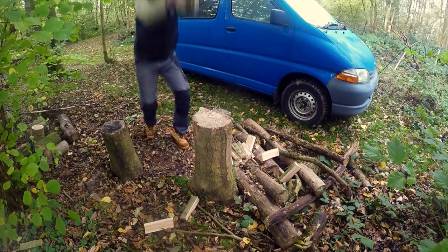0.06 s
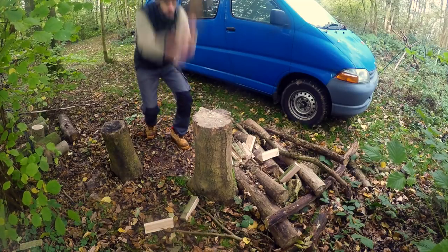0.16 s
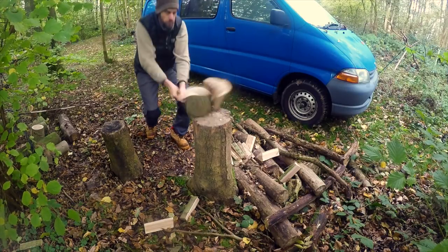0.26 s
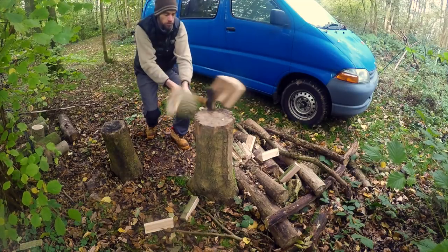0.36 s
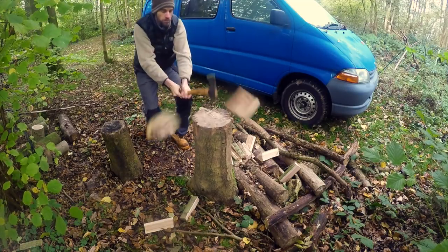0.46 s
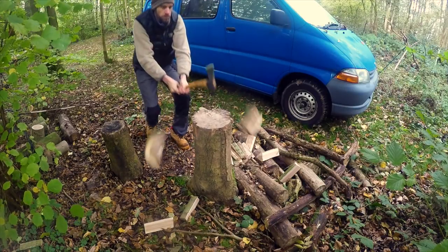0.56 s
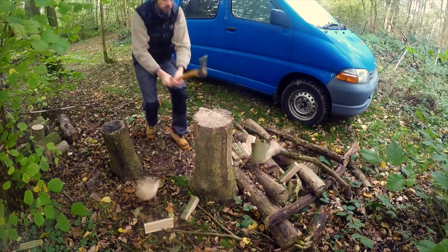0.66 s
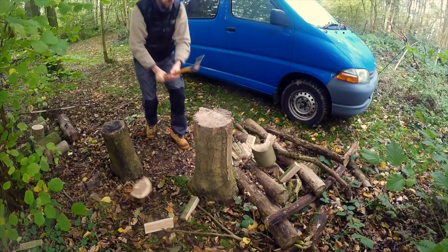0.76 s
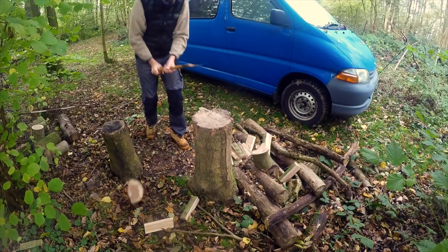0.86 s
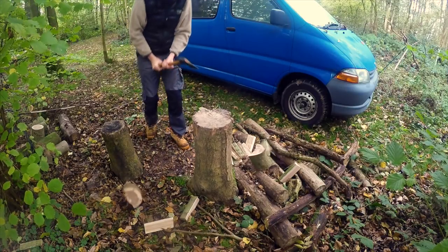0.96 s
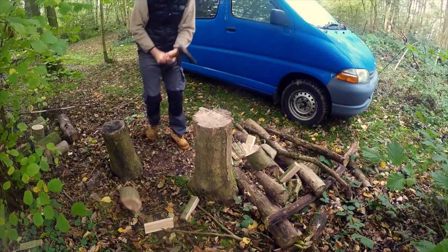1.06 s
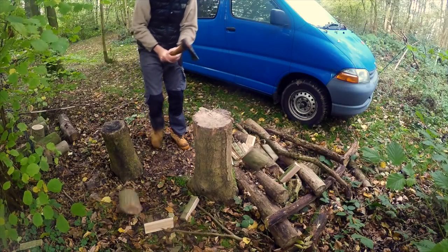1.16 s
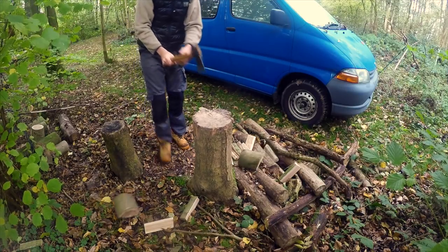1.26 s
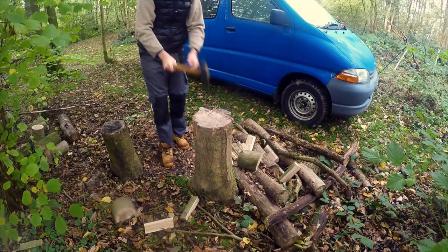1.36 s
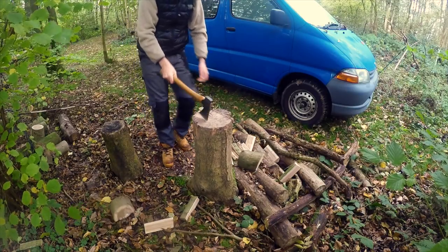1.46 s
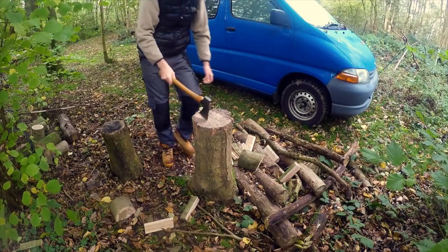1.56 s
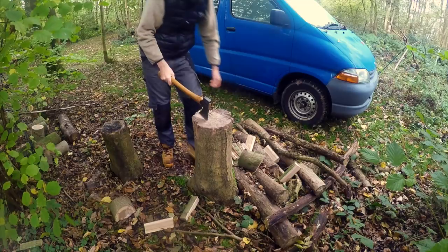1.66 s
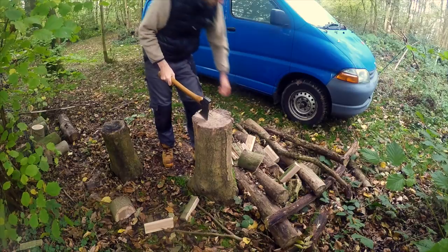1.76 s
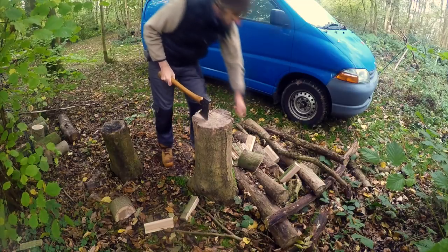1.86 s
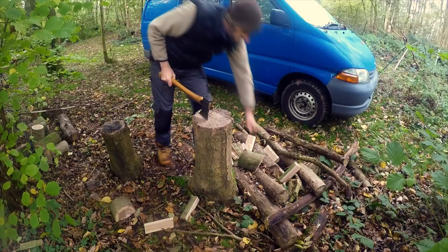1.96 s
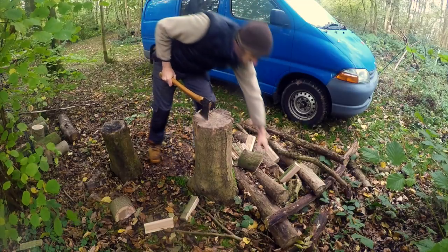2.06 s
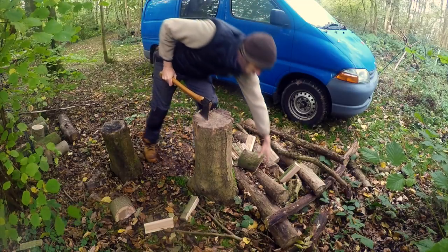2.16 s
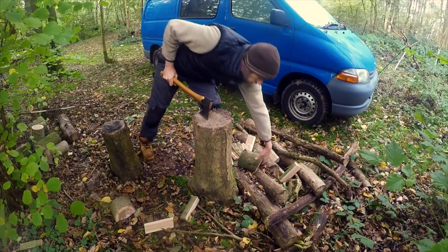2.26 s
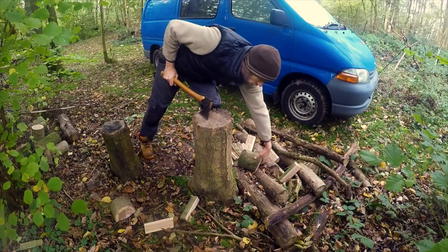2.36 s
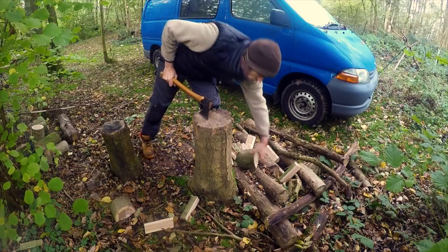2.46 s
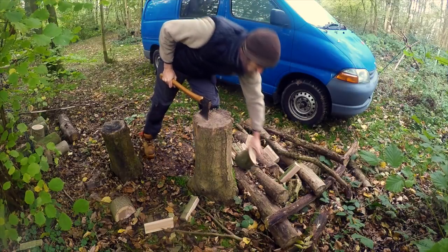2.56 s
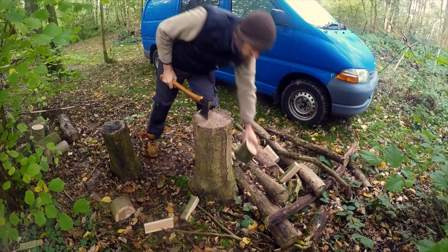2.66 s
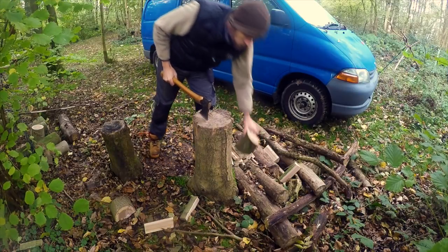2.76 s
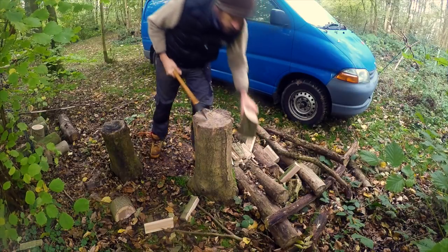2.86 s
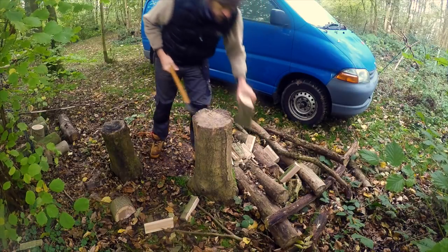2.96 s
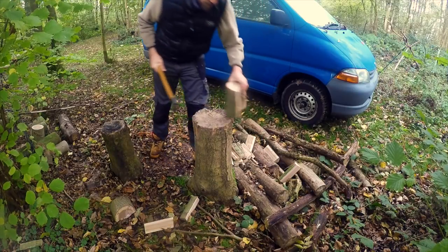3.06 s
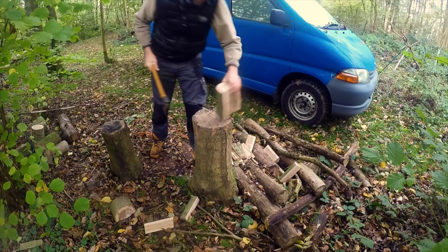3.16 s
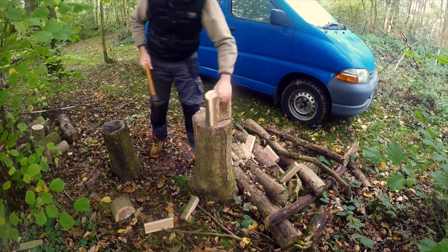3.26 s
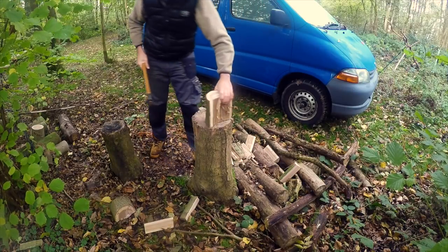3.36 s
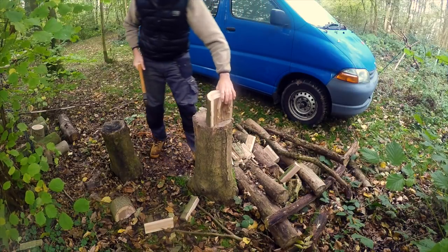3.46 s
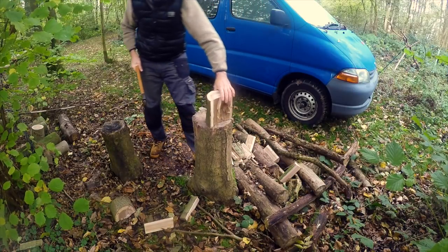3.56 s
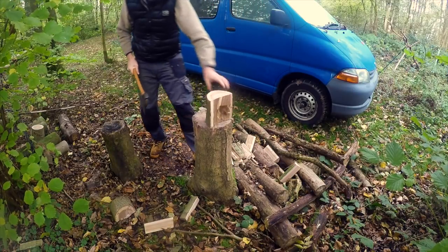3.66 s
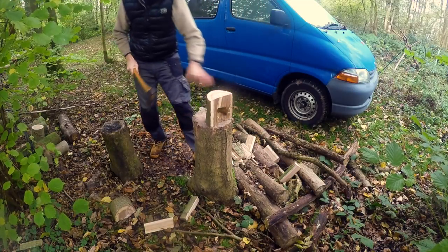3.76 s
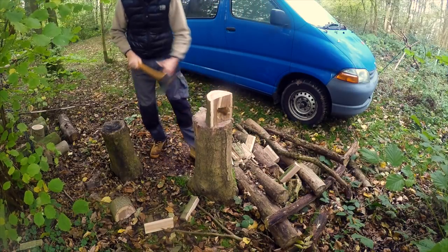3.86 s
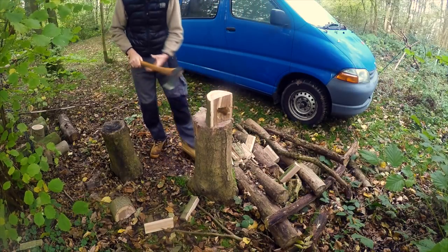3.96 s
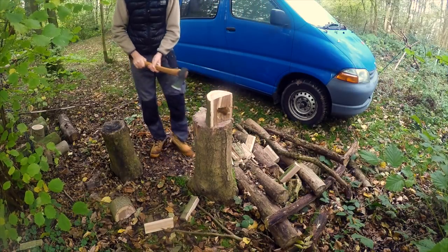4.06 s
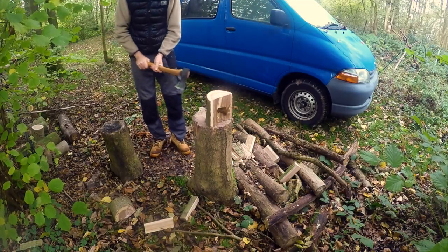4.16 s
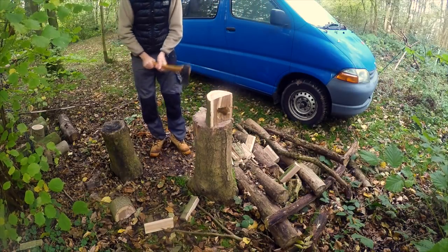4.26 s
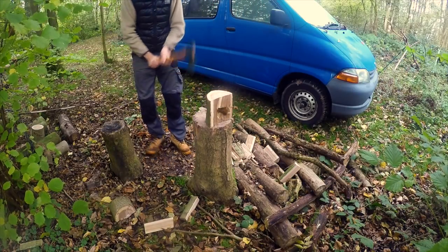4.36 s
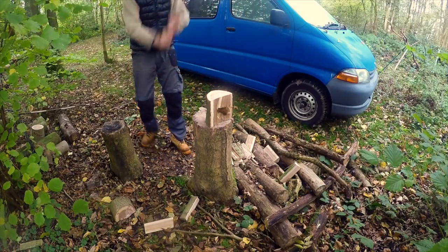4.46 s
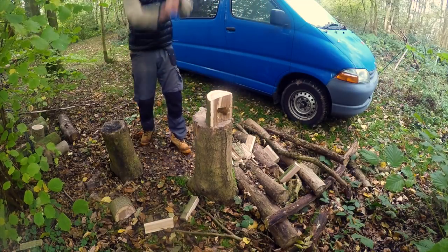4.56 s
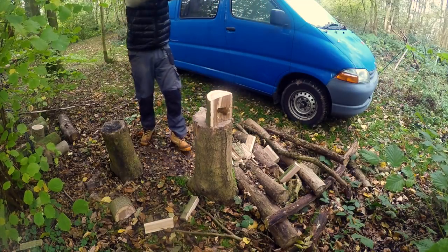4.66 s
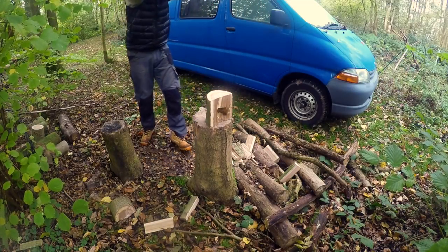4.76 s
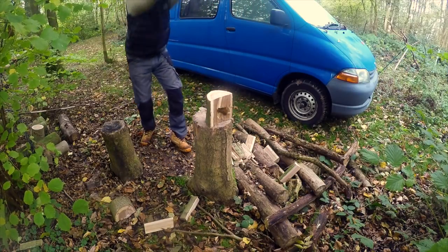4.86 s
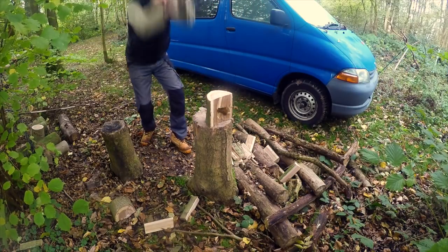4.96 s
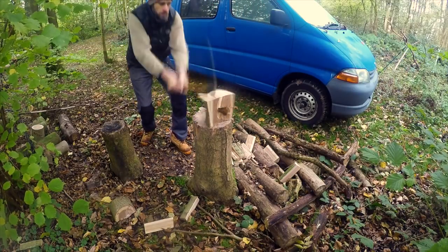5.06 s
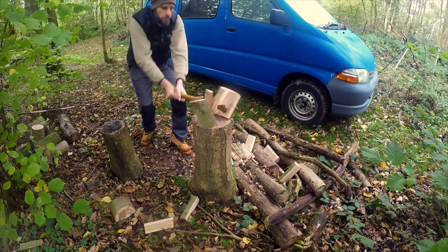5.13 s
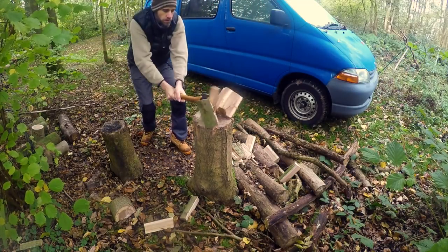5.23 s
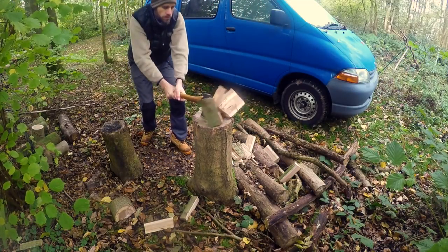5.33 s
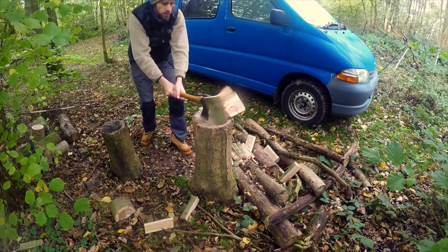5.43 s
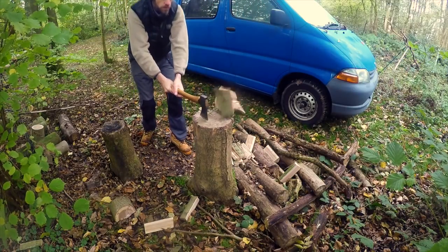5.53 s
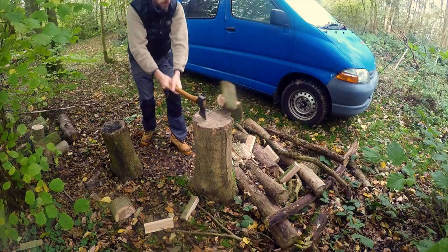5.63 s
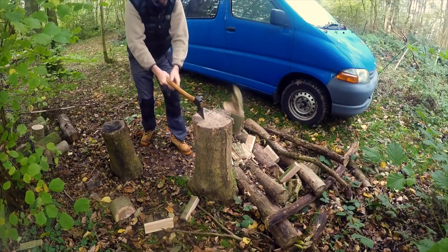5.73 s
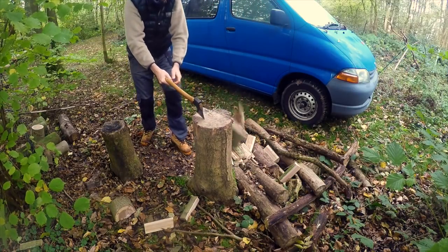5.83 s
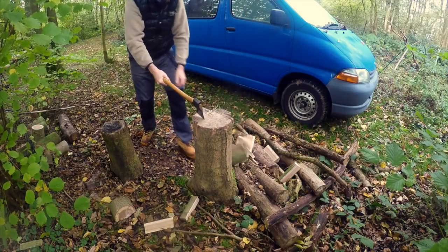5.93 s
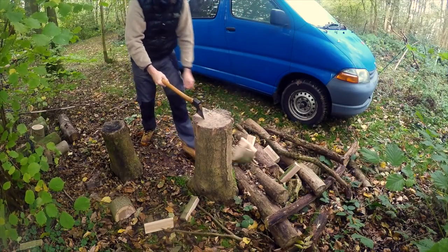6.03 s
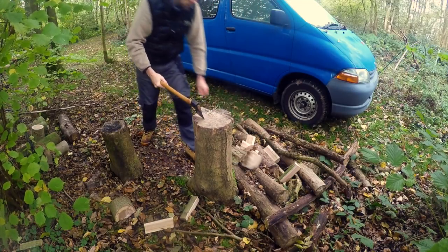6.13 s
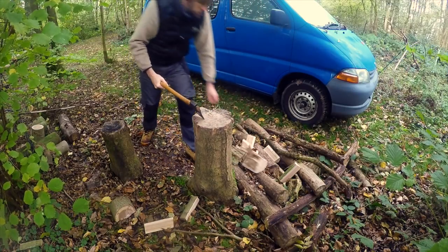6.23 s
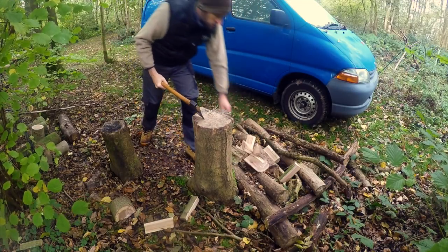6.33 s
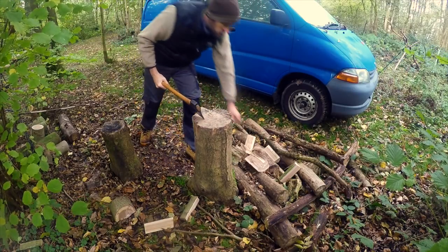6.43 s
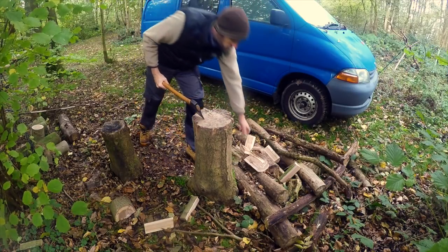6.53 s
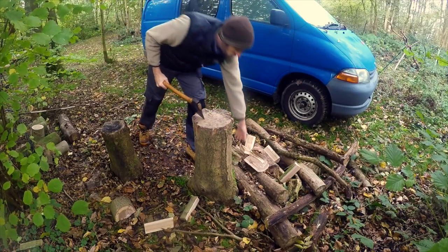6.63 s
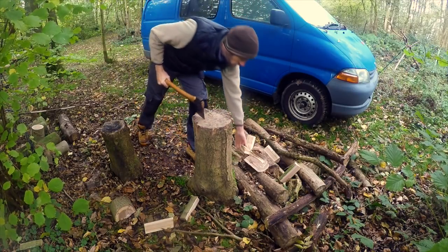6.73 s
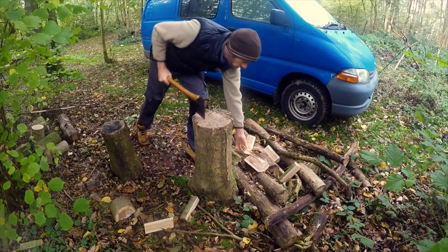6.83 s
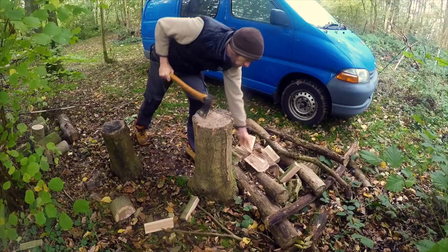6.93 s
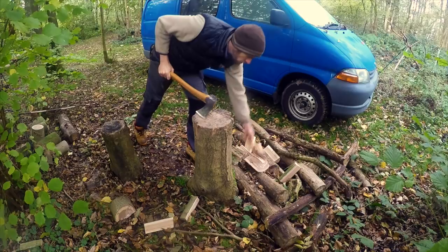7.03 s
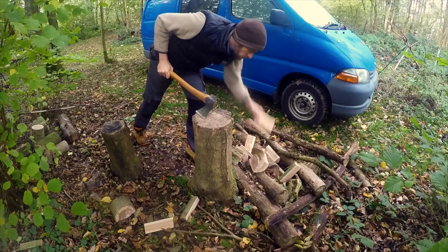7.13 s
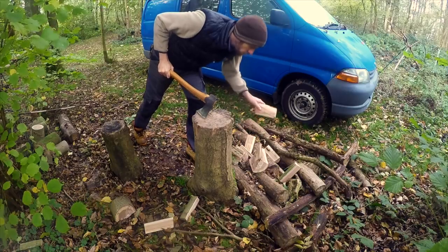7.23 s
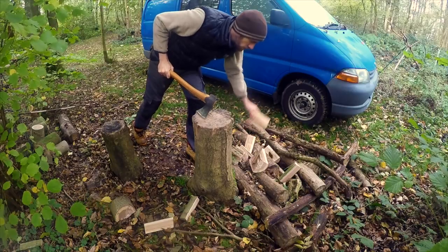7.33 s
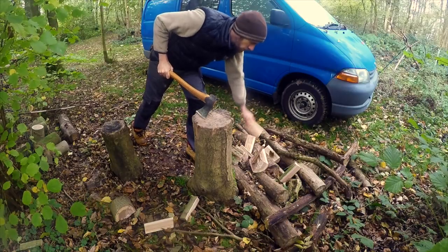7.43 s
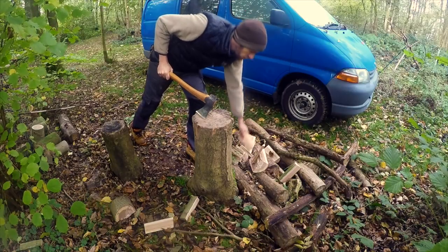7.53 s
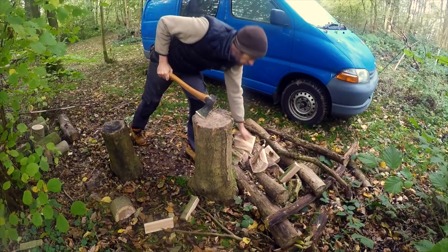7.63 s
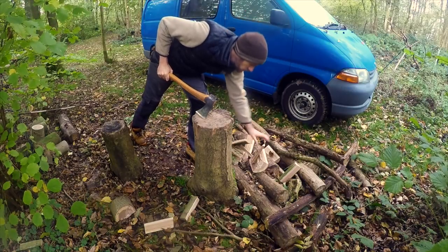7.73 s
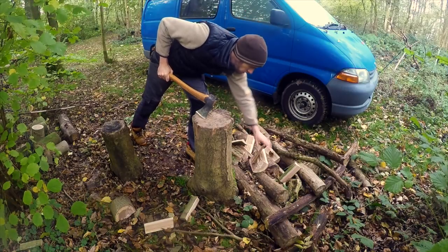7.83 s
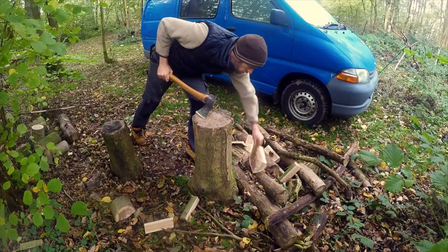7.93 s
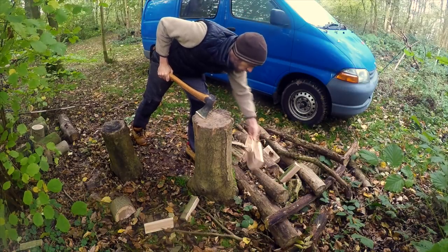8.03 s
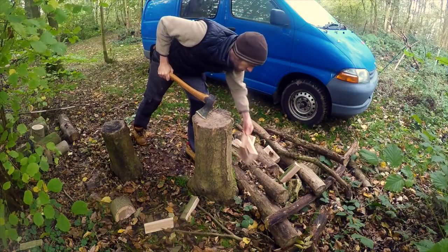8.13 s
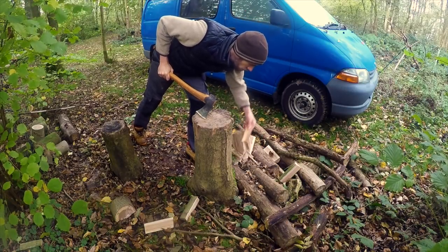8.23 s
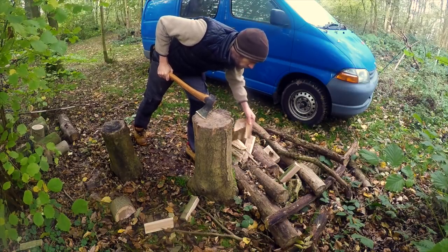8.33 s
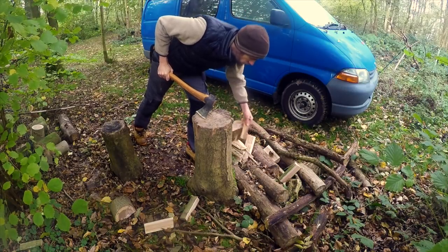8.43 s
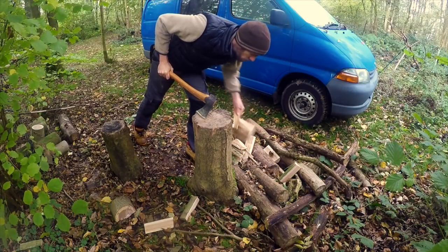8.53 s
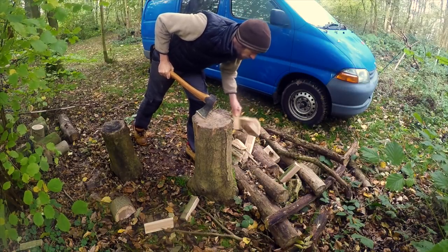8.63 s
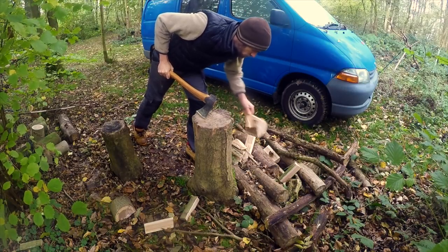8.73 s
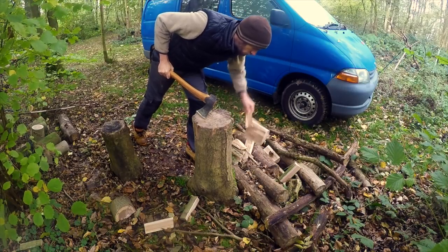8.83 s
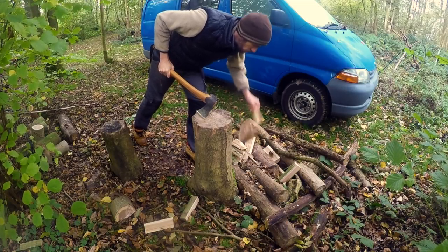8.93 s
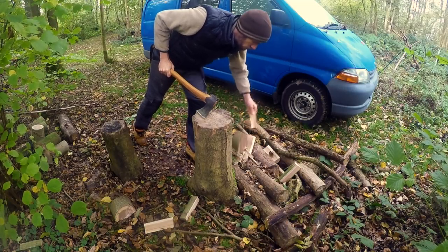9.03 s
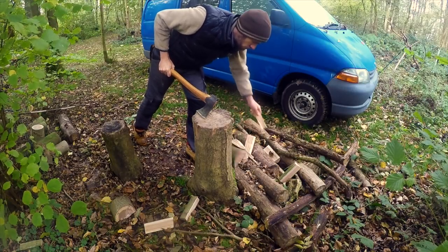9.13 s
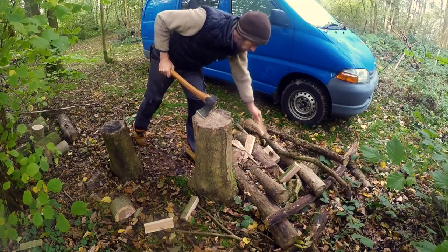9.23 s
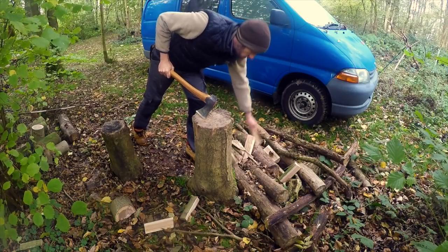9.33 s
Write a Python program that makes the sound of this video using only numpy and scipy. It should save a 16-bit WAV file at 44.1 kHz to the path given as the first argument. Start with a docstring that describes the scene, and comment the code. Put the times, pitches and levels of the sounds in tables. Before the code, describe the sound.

In a wood, close to the microphone, two heavy axe chops land about five seconds apart, each with a splintering crack and a short echo. Split pieces fall and bounce with hollow knocks after both. In between and afterwards come lighter taps, crunching dry leaves and small twig snaps, ending with a sharp wooden clack. A far road hums softly throughout, with one faint two-note horn.

```python
"""An axe strikes a log on a stump in a wood: stump and steel ring, fibres tear, the ground thumps.
The halves tumble onto billets and dry leaves, knocking and grinding their bark. Boots and hands
rustle the litter and snap twigs. Behind it a far road hums with an engine and a two-note horn, and
the canopy hisses. Trunks echo the blows; loud ones clip and pull the gain down for a moment."""
import sys
import numpy as np
from scipy import signal
from scipy.fft import rfft, irfft, next_fast_len
from scipy.io import wavfile
from scipy.ndimage import uniform_filter1d, map_coordinates

SR = 44100
rng = np.random.default_rng(int(sys.argv[2]) if len(sys.argv) > 2 else 0)


def waveform_to_disk(signal):
    """Save audio, clipped to [-1, 1], as 16-bit WAV at the path in sys.argv[1]."""
    frames = np.transpose(np.atleast_2d(signal))
    scaled = np.clip(frames, -1, 1) * 32767
    samples = np.round(scaled).astype(np.int16)
    wavfile.write(sys.argv[1], SR, samples)


N = 414099
T = np.arange(SR // 2) / SR  # time within one event, s

# axe blows: t/s, level/dB, crack/dB, steel/dB, splinters/dB, contact/s; layers relative to level
BLOWS = [(0.2484, 1.5, -14.5, -64.5, -6.5, 0.00087), (0.2553, -2, -11.5, -65, 1.5, 0.00046),
         (0.2749, 3, -24, -59, -8.5, .0008), (1.4793, -14.5, -36, -43, -10.5, 0.0012),
         (3.262, -12, -27.5, -36, -7.5, 0.0019), (5.0892, 3, -14, -49, -5, .0025),
         (5.097, -1.5, -6.5, -19.5, -7.5, .0009), (5.121, -23.5, -6, -14.5, -8.5, 0.0017),
         (5.139, -10.5, -25.5, -38, -6, 0.0017)]
# modes of the unloaded stump: f/Hz, level/dB, t60/s
STUMP_MODES = [(315, -19.5, 0.02), (407.6, -8, 0.015), (701.7, -3.5, 0.04), (785.5, 1.5, 0.06),
               (1154, -11.5, 0.037)]
# axe head modes: f/Hz, level/dB, t60/s
STEEL_MODES = [(1620, -17, .5), (3180, -25, .8), (3290, -28, .45), (3385, 6, .06), (4500, -3, .04),
               (8790, 1, .04)]
# spectrum of cracking fibres and bark: f/Hz, level/dB
CRACK_SPECTRUM = [(900, -27.5), (1500, -14), (2500, -6), (3330, -1.5), (4200, -3.5), (6000, -7.5),
                  (11000, -6), (15600, -16)]
# spectrum of splinters and grit: f/Hz, level/dB
SPLINTER_SPECTRUM = [(60, -42), (120, 0), (300, 2.5), (800, 0), (1300, -4), (2200, -21.5), (4000, -40.5)]


def axe():
    """Each blow rings stump and steel and tears fibres. Returns rows: ringing, noise."""
    ringing, noisy = np.zeros((2, N + SR))
    loaded_modes = [(hz, db, 0.69 * t60) for hz, db, t60 in STUMP_MODES]  # wood on top damps the stump
    for s, db, crack_db, steel_db, splinter_db, contact_s in BLOWS:
        fibres = noise(CRACK_SPECTRUM, len(T))
        fibres *= fade(0.048, contact_s / 2) + amp(-17.5) * fade(0.21, 0.004)
        splinters = noise(SPLINTER_SPECTRUM, len(T), tilt_db_oct=2)
        splinters *= fade(0.033, contact_s) + amp(-13.5) * fade(0.071, 0.0018)
        stump = ring(loaded_modes, contact_s, scatter_db=2.4)
        grip = 0.5 + 1.3 * roughness(samples=120)  # wood rubs and chokes the blade
        steel = grip * ring(STEEL_MODES, rise_s=0.0014, scatter_db=1.5)
        add(ringing, s, amp(db) * (stump + amp(steel_db) * steel))
        add(noisy, s, amp(db) * (amp(crack_db) * fibres + amp(splinter_db) * splinters))
    return np.array([ringing[:N], noisy[:N]])


# heavy shocks: t/s, level/dB, f/Hz, t60/s
THUMPS = [(0.251, -5, 56, 0.17), (0.274, -18, 45.5, 0.13), (0.714, -10.5, 74, 0.13), (3.272, -27, 50, 0.16),
          (5.091, -19, 43.5, 0.18), (5.947, -23.5, 146, 0.22), (5.946, -21, 364.3, 0.22),
          (9.127, -30, 148, 0.12), (9.129, -15, 258, 0.06), (9.135, -32, 366, 0.17)]


def thumps():
    """Heavy shocks ring the ground and the long logs."""
    out = np.zeros(N + SR)
    for s, db, hz, t60 in THUMPS:
        add(out, s, ring([(hz, db, t60)], rise_s=0.006, scatter_db=0))
    return out[:N]


# wood on wood, and at 5.903 s a light tap on the axe steel: t/s, level/dB, base f/Hz, base t60/s, grit/dB,
# bark/dB; layers relative to level
KNOCKS = [(0.679, -7.5, 577, 0.045, -17, -43), (0.702, -18.5, 292, 0.07, -7.5, -28),
          (0.718, -31.5, 454, 0.069, -2, -13), (0.7955, -6, 463, 0.022, -17.5, -56),
          (0.804, -24, 605, 0.054, -26, -42), (0.921, -18.5, 604, 0.062, -15, -34.5),
          (0.928, -24.5, 337, .07, -12, -35), (0.9697, -14, 617, .026, -20, -48),
          (1.006, -22.5, 810, 0.065, -7.5, -42), (1.105, -35.5, 650, .045, -3, -33),
          (1.169, -27, 525, 0.038, -2.5, -31), (1.229, -29.5, 553, 0.038, 3, -16),
          (1.251, -33.5, 830, 0.062, -2.5, -32), (1.702, -39, 460, .054, -6, -25),
          (1.749, -32.5, 482, 0.069, 0, -16), (5.199, -32, 920, 0.047, -5, -17),
          (5.258, -31.5, 696, 0.023, 6.5, -28), (5.274, -28, 810, 0.023, 1, -20),
          (5.287, -34.5, 600, 0.026, 1.5, -20), (5.377, -24.5, 835, 0.025, -3, -31),
          (5.443, -34.5, 650, 0.026, -2, -13.5), (5.493, -26, 630, 0.019, -0.5, -25.5),
          (5.54, -32, 615, 0.029, -6, -31), (5.552, -27.5, 960, 0.018, -6.5, -33),
          (5.903, -47, 1600, 0.11, -2, -8), (5.937, -5, 582, .07, -8.5, -36),
          (5.944, 0, 600, 0.029, -5, -23), (5.957, -33, 568, 0.048, -14, -14),
          (6.018, -22.5, 590, 0.041, 3, -17.5), (6.043, -23.5, 990, 0.041, -2, -21),
          (6.065, -37, 580, 0.11, 1, -9), (6.128, -30, 1100, 0.016, 1, -16),
          (6.136, -28, 617, 0.064, -9, -25), (6.204, -45, 869, 0.1, 4, -4),
          (6.273, -27.5, 274, 0.036, -12, -45), (6.466, -34, 1520, 0.032, -6, -10),
          (6.477, -33.5, 2140, 0.059, -15, -11.5), (7.13, -37.5, 1105, 0.042, 1.5, -11),
          (7.602, -20, 1045, 0.024, -10, -32), (8.829, -43, 1590, .048, -9, -16),
          (8.877, -23, 1590, 0.021, -17, -14.5), (9.122, -13.5, 1360, 0.025, -0.5, -5.5),
          (9.13, -20, 1086, 0.045, 4.5, -17), (9.14, -22, 600, 0.055, -5, -24),
          (9.211, -44.5, 2700, 0.045, 4.5, -3)]
# billet modes: f/base, level/dB, t60/base
BILLET_MODES = [(0.602, -4, 0.73), (1.002, 2, 0.87), (1.7, -20.5, 0.25), (2.7, -53, 0.75)]


def billets(contact_s=0.0021):
    """Modes scale with each piece's size; rough bark grinds on contact. Returns rows: ringing, noise."""
    ringing, noisy = np.zeros((2, N + SR))
    cushion = 1 - np.exp(-T / contact_s)  # bark softens the onset
    for s, db, hz, t60, grit_db, bark_db in KNOCKS:
        modes = [(hz * f_ratio, mode_db, t60 * t_ratio) for f_ratio, mode_db, t_ratio in BILLET_MODES]
        grit = noise(SPLINTER_SPECTRUM, len(T)) * fade(1.29 * t60, contact_s)
        bark = noise(CRACK_SPECTRUM, len(T), tilt_db_oct=-6.5)
        bark *= fade(0.029, 0.00051) + amp(-6) * fade(0.17, 0.0035)
        add(ringing, s, amp(db) * cushion * ring(modes, contact_s, scatter_db=2.9))
        add(noisy, s, amp(db) * (amp(grit_db) * grit + amp(bark_db) * bark))
    return np.array([ringing[:N], noisy[:N]])


# breaking twigs and splinters: t/s, level/dB, f/Hz
SNAPS = [(0.7178, -35, 3360), (1.2356, -35.5, 2680), (1.3794, -59, 3200), (2.3391, -57, 3080),
         (2.4289, -46, 3030), (2.5052, -55, 3430), (2.592, -51, 3050), (2.6344, -50, 3070),
         (7.1132, -55, 3190), (7.1831, -47, 3090), (7.2175, -42, 3300), (7.2804, -55, 3250),
         (7.62, -54, 3430), (7.9044, -47, 3130), (8.0424, -42, 2950), (8.6594, -50, 3230),
         (9.1254, -18, 3080)]


def snaps():
    """Single twigs and splinters break with a short dry ring."""
    out = np.zeros(N + SR)
    for s, db, hz in SNAPS:
        fray = 0.86 + 0.45 * roughness(samples=60)  # fibres part unevenly
        modes = [(hz, db, 0.032), (1.09 * hz, db - 3, 0.022)]
        add(out, s, fray * ring(modes, rise_s=0.0012, scatter_db=1.7))
    return out[:N]


# leaf crushes: t/s, level/dB, t60/s, tilt/(dB/oct)
RUSTLES = [(0.518, -45, 0.075, -4.5), (0.6854, -36, 0.15, -1), (0.715, -31.5, 0.08, 6),
           (0.814, -44, 0.069, 10), (0.8885, -50.5, 0.24, 3), (0.941, -45, 0.12, 1.1),
           (1.236, -40.5, 0.15, -3), (1.298, -48, 0.17, -2), (1.359, -43.5, .19, -1.5),
           (1.7044, -44, 0.38, 0.2), (1.744, -39, 0.091, 2.5), (2.058, -38, .07, 16),
           (2.1293, -50, 0.28, 6), (2.1834, -50, .1, 3), (2.27, -49, .07, 6), (2.314, -50, .07, 7),
           (2.363, -44.5, 0.058, 6), (2.4264, -43, 0.063, -3.5), (2.478, -48, 0.11, 2.1),
           (2.5875, -47, 0.24, 2), (2.634, -47.5, 0.21, 2), (3.039, -53, .078, .1),
           (3.9685, -50.5, 0.15, 5.5), (4.0725, -46, 0.25, 3), (4.2003, -46.5, 0.054, 4.5),
           (4.4394, -49, .103, 14), (4.4867, -44.5, .24, 3), (5.1192, -19, 0.072, -14),
           (5.3371, -36, 0.058, -2.5), (5.84, -38, .078, -5.5), (6.2172, -40.5, 0.086, 3),
           (6.4877, -44, .1, -5), (7.1008, -38.5, 0.17, 0), (7.1827, -41, .068, -2),
           (7.215, -42.5, 0.065, -2.5), (7.355, -53, 0.1, 1), (7.671, -51, 0.11, -1),
           (7.902, -48, 0.098, -0.5), (7.928, -49, 0.11, 1), (8.032, -46.5, 0.11, 0),
           (8.4818, -38, 0.07, 8.5), (8.6137, -46.5, 0.2, 1), (8.7045, -51.5, 0.16, 1.1),
           (8.831, -41.5, .099, 6), (8.8779, -31.5, 0.067, 3.5), (9.146, -48, 0.22, -1.5),
           (9.3267, -45.5, 0.19, -1.5)]
# dry leaf spectrum: f/Hz, level/dB
LEAF_SPECTRUM = [(900, -15.5), (1600, -5), (2700, -12.5), (3200, -6.5), (3800, -10.5), (7000, -12.5),
                 (10000, -11), (14400, -16.5), (15600, -17.5)]


def leaves():
    """Crushed leaves give puffs of dense crackle; long puffs start softly."""
    out = np.zeros(N + SR)
    for s, db, t60, tilt_db_oct in RUSTLES:
        crunch = unit(crackle(len(T), depth_db=1.8) * noise(LEAF_SPECTRUM, len(T), tilt_db_oct))
        add(out, s, amp(db) * fade(t60, rise_s=0.068 * t60) * crunch)
    return out[:N]


# drags through litter: start/s, loudest/s, end/s, top level/dB, twigs/dB relative to the hiss
SCUFFS = [(0.66, 0.75, 1.57, -60.5, -21), (1.2, 1.366, 1.66, -56.5, -18), (1.97, 2.124, 2.39, -61.5, -23),
          (2.2, 2.55, 2.7, -57.5, -15), (3.9, 4.06, 4.33, -62.5, -20), (4.213, 4.45, 4.9, -63, -24),
          (5.15, 5.25, 5.63, -57, -16), (5.92, 5.97, 6.5, -54, -16), (6.95, 7.095, 7.3, -64, -5),
          (7.58, 7.699, 7.87, -70.5, -4.5), (9.157, 9.384, 9.5, -55, -11)]


def scuffs(swell_db=12):
    """Boots and rolling wood push litter along: uneven hiss and twigs swell and fade."""
    t = np.arange(N) / SR
    hiss_gain, twig_gain = np.zeros((2, N))
    for start, loudest, end, db, twig_db in SCUFFS:
        swell = amp(db - np.interp(t, [start, loudest, end], [swell_db, 0, swell_db]))
        swell *= gate(t, start, end, ramp_s=0.047)
        hiss_gain += swell
        twig_gain += amp(twig_db) * swell
    grains = crackle(N, depth_db=2.5) * amp(1.6 * wobble(30))
    hiss = unit(grains * noise(LEAF_SPECTRUM, N, tilt_db_oct=0.27))
    return hiss_gain * hiss + twig_gain * twigs()


def twigs(rate_per_s=90, hz=3120, t60_s=0.014):
    """Small twigs snap at random with uneven strength, each a short dry ring."""
    breaks = rng.random(N) < rate_per_s / SR
    strength = amp(4 * np.minimum(rng.exponential(size=N), 3))
    tick = ring([(hz, 0, t60_s)], rise_s=0.001, scatter_db=0)
    return unit(signal.fftconvolve(breaks * strength, tick)[:N])


# tyre roar over time: t/s, level/dB
TYRE_LEVELS = [(0, -51.5), (.9, -50.5), (2.6, -51.5), (3.5, -52), (4.2, -50), (4.9, -52), (5.4, -49),
               (6.6, -51.5), (7.5, -51.5), (8.5, -53), (9.39, -52)]
# tyre spectrum: f/Hz, level/dB
TYRE_SPECTRUM = [(60, 5.5), (130, 0.5), (200, -0.5), (320, -2), (500, -5), (650, -4), (850, 0.5),
                 (1300, -2), (1650, -11.5), (2100, -17.5), (3500, -35), (6000, -73.5)]
# road rumble spectrum: f/Hz, level/dB
RUMBLE_SPECTRUM = [(8.8, -29.5), (15, -5.5), (32, 1), (48, 0.5), (108, -10), (124, -22), (146, -19.5),
                   (200, -24.5), (260, -53), (440, -120)]


def road():
    """Far traffic: drifting tyre roar over a low rumble."""
    tyre_db = np.interp(np.arange(N) / SR, *np.transpose(TYRE_LEVELS))
    tyres = amp(tyre_db + 0.22 * wobble(6.5)) * noise(TYRE_SPECTRUM, N)
    rumble = amp(-43 + 0.9 * wobble(2.5)) * noise(RUMBLE_SPECTRUM, N)
    return tyres + rumble


# horn notes: start/s, end/s, start f/Hz, end f/Hz, level/dB, relative second harmonic/dB
HORN_NOTES = [(3.88, 4.17, 430, 433, -56, -2.5), (4.17, 4.68, 355, 360, -58, -5)]
# engine hum: same columns
ENGINE_NOTES = [(1.0, 1.9, 150.5, 156.8, -54.5, -35), (1.2, 1.85, 257.8, 270, -57.5, -28)]


def vehicle_tones(notes):
    """Far horn or engine notes with soft ends, wavering in the air."""
    t, out = np.arange(N) / SR, np.zeros(N)
    for start, end, start_hz, end_hz, db, second_db in notes:
        hz = np.interp(t, [start, end], [start_hz, end_hz]) + 1.03 * wobble(1.4)
        phase = 2 * np.pi * np.cumsum(hz) / SR
        gain = gate(t, start, end, ramp_s=0.036) * amp(db + 2 * wobble(7))
        out += gain * (np.sin(phase) + amp(second_db) * np.sin(2 * phase))
    return out


# treetop spectrum: f/Hz, level/dB
CANOPY_SPECTRUM = [(1180, -27.5), (2000, -6.5), (3530, -6), (4150, -6.5), (4810, -7.5), (5330, -8.5),
                   (8470, -12), (9160, -11.5), (13600, -14.5), (14700, -9.5), (15600, -15.5)]


def canopy():
    """Faint, nearly steady hiss of the treetops."""
    return amp(-67 + 0.31 * wobble(4)) * noise(CANOPY_SPECTRUM, N)


# echo decay among trunks: f/Hz, t60/s
ECHO_DECAY = [(200, 0.2), (1500, 0.41), (4000, .45), (7000, 0.26), (12000, 0.15)]


def trunk_echo(x, delay_s=0.012):
    """Trunks scatter the sound; each frequency dies at its own rate."""
    hz, t, spectra = signal.stft(rng.standard_normal(SR), SR, nperseg=256)
    dying = spectra * amp(-60 * t / log_interp(ECHO_DECAY, hz)[:, None])
    tail = signal.istft(dying, SR, nperseg=256)[1]
    delayed = np.pad(x, (round(delay_s * SR), 0))
    return signal.fftconvolve(delayed, tail / np.linalg.norm(tail))[:N]


def amp(db):
    """dB to gain."""
    return 10 ** (np.asarray(db) / 20)


def unit(x):
    """Scales to rms 1."""
    return x / np.sqrt(np.mean(x ** 2) + 1e-20)


def log_interp(points, hz):
    """Interpolates (f/Hz, value) points on a log axis."""
    f, values = np.transpose(points)
    return np.interp(np.log(hz + 1), np.log(f + 1), values)


def wobble(knots_per_s):
    """Smooth random curve, rms near 1."""
    knots = rng.standard_normal(int(N * knots_per_s / SR) + 4)
    return map_coordinates(knots, [np.arange(N) * knots_per_s / SR])


def roughness(samples):
    """Moving average of noise, one event long, rms 1."""
    return unit(uniform_filter1d(rng.standard_normal(len(T)), size=samples))


def crackle(size, depth_db):
    """Gain that jumps every 64 samples, now and then far up."""
    jumps = rng.exponential(size=size)[np.arange(size) // 64]
    return amp(depth_db * np.minimum(jumps, 4.5))


def filtered(x, response):
    """Applies the gain response(hz) by FFT."""
    size = next_fast_len(len(x) + SR // 4)
    return irfft(rfft(x, size) * response(np.fft.rfftfreq(size, 1 / SR)), size)[:len(x)]


def noise(spectrum, size, tilt_db_oct=0):
    """Coloured noise, rms 1."""
    colour = lambda hz: amp(log_interp(spectrum, hz) + tilt_db_oct * np.log2(hz + 50))
    return unit(filtered(rng.standard_normal(size), colour))


def fade(t60_s, rise_s):
    """Exponential rise and decay."""
    return amp(-60 * T / max(t60_s, 0.003)) * (1 - np.exp(-T / max(rise_s, 1e-4)))


def gate(t, start, end, ramp_s):
    """Window with linear ramps."""
    return np.clip(np.minimum(t - start, end - t) / ramp_s, 0, 1)


def ring(modes, rise_s, scatter_db):
    """Damped sines (f/Hz, level/dB, t60/s) with random level scatter."""
    return sum(amp(db + rng.normal(0, scatter_db)) * fade(t60, rise_s) * np.sin(2 * np.pi * hz * T)
               for hz, db, t60 in modes)


def add(track, s, sound):
    """Mixes a sound in at s seconds."""
    track[round(s * SR):][:len(sound)] += sound


def scene():
    """All sources at the microphone, mono."""
    axe_ring, axe_noise = axe()
    shocks = thumps()
    billet_ring, billet_noise = billets()
    ringing = axe_ring + shocks + billet_ring
    cracks = axe_noise + billet_noise + snaps()
    echo = trunk_echo(amp(-37) * ringing + amp(-21) * cracks)  # cracks carry further than the ring
    litter = leaves() + scuffs()
    background = road() + canopy() + vehicle_tones(HORN_NOTES) + vehicle_tones(ENGINE_NOTES)
    return (ringing + cracks + echo + litter + background)[None]


# microphone port dip and peak: f/Hz, width/Hz, added share
PORT_BANDS = [(2100, 700, -0.3), (3340, 360, 0.14)]


def record(dry, duck_threshold=0.15, recovery_s=0.23, ceiling=0.97, cutoff_hz=15350):
    """Small camera: port colour, gain ducking after loud sound, soft clip, steep low-pass."""
    x = dry[0]
    for hz, width_hz, share in PORT_BANDS:
        x = x + share * signal.lfilter(*signal.iirpeak(hz, hz / width_hz, SR), x)
    excess = np.maximum(uniform_filter1d(np.abs(x), size=256) - duck_threshold, 0)
    recovery = np.exp(-np.arange(SR) / SR / recovery_s)
    ducked = x / (1 + 0.0016 * np.abs(signal.fftconvolve(excess, recovery)[:N]))
    clipped = ducked / (1 + np.abs(ducked / ceiling) ** 4) ** (1 / 4)
    return filtered(clipped, lambda hz: 1 / (1 + (hz / cutoff_hz) ** 110))[None]


dry = scene()
out = record(dry)
waveform_to_disk(out)
```